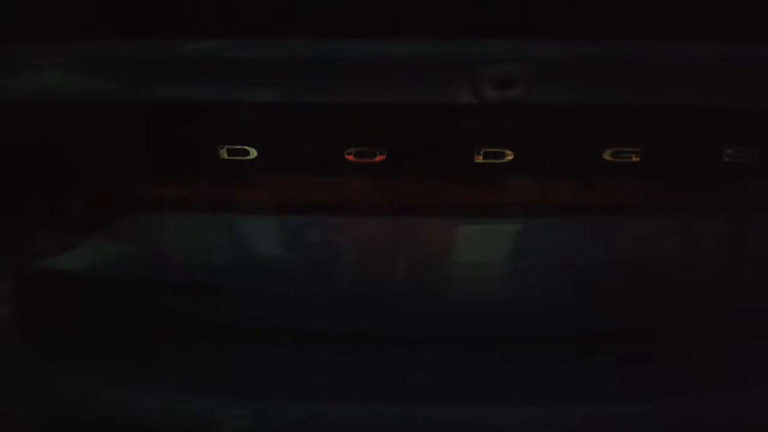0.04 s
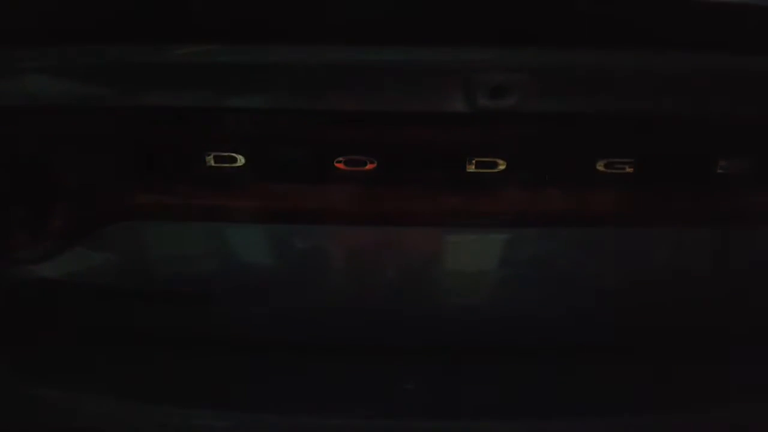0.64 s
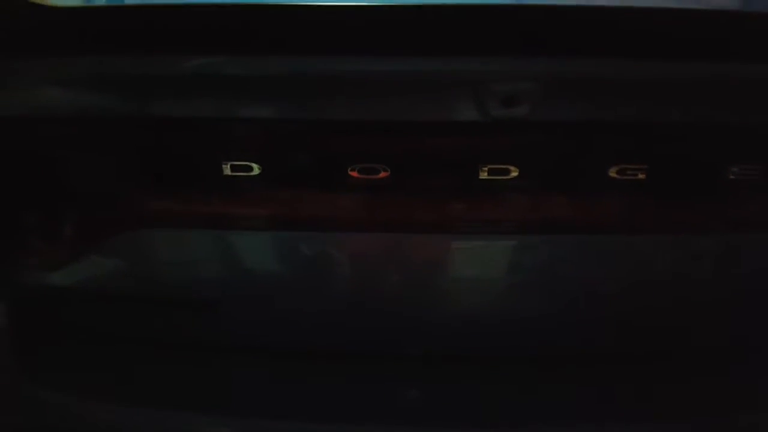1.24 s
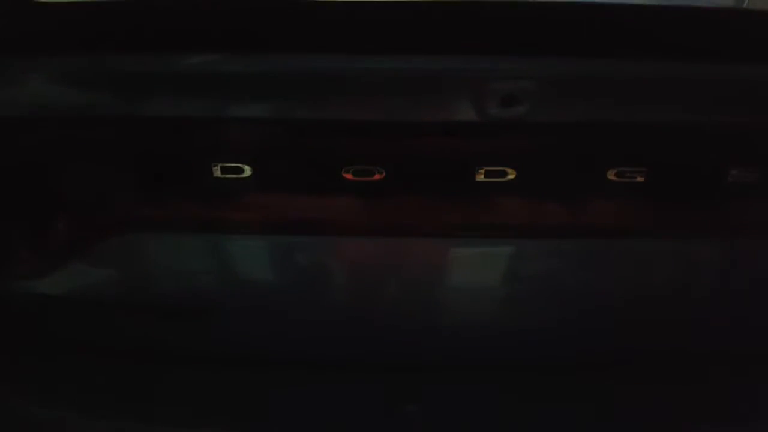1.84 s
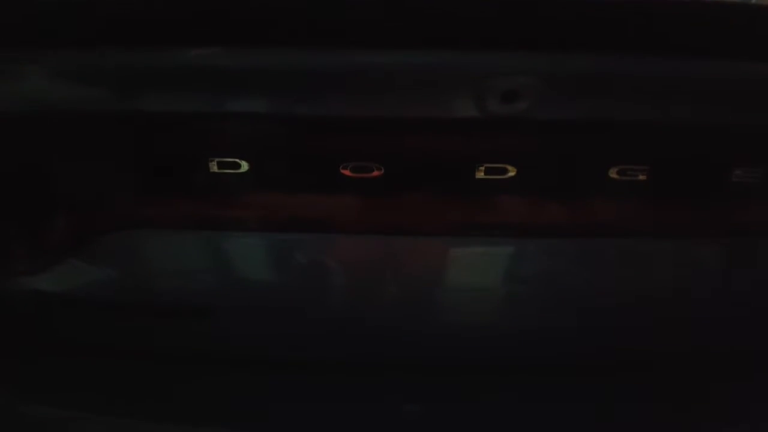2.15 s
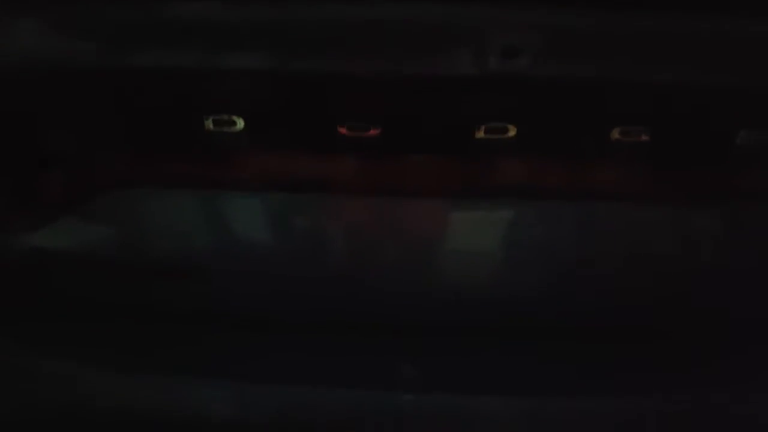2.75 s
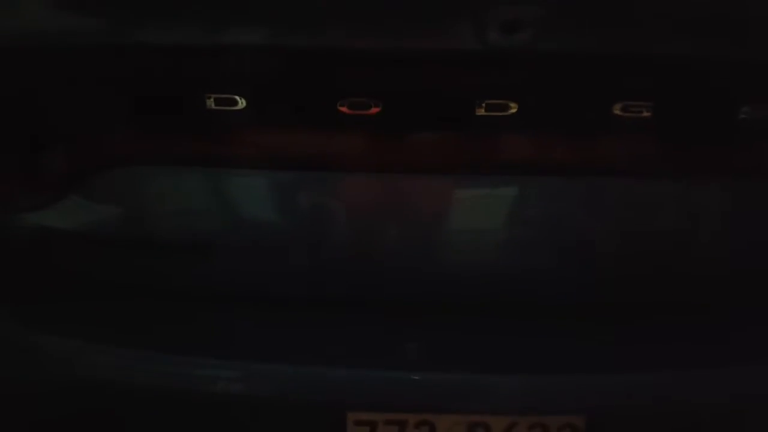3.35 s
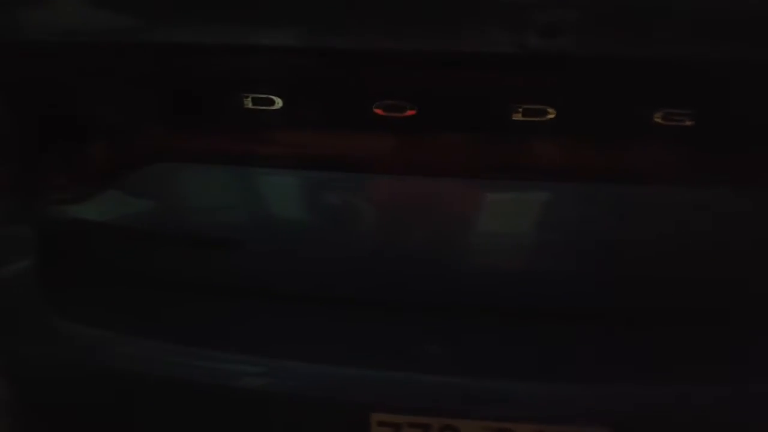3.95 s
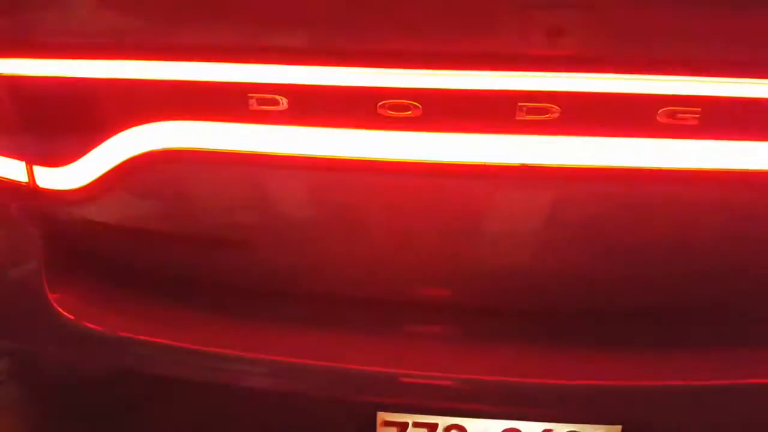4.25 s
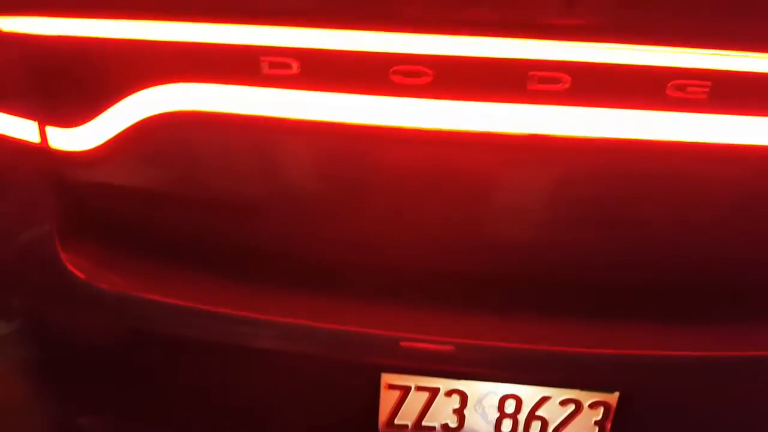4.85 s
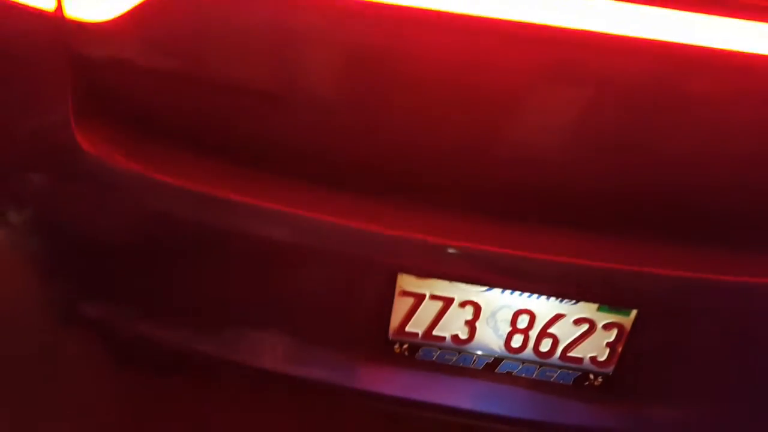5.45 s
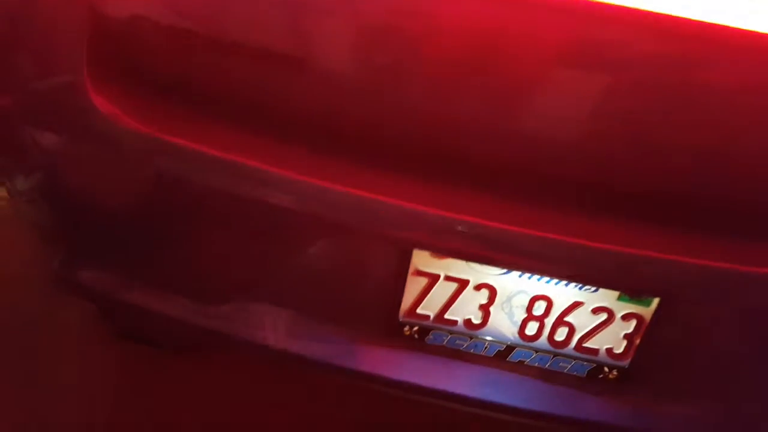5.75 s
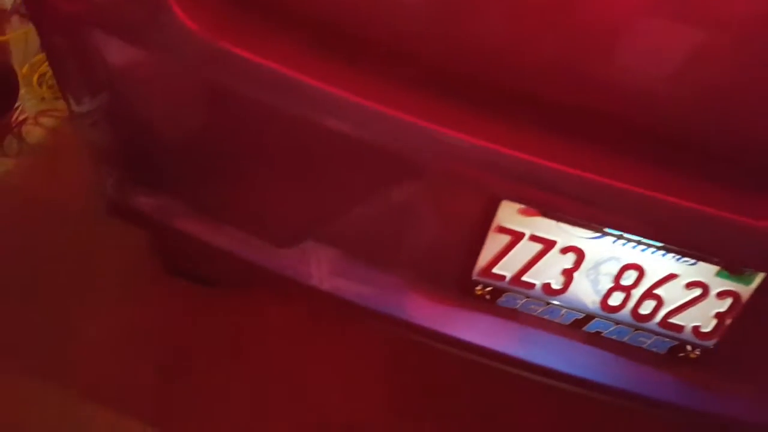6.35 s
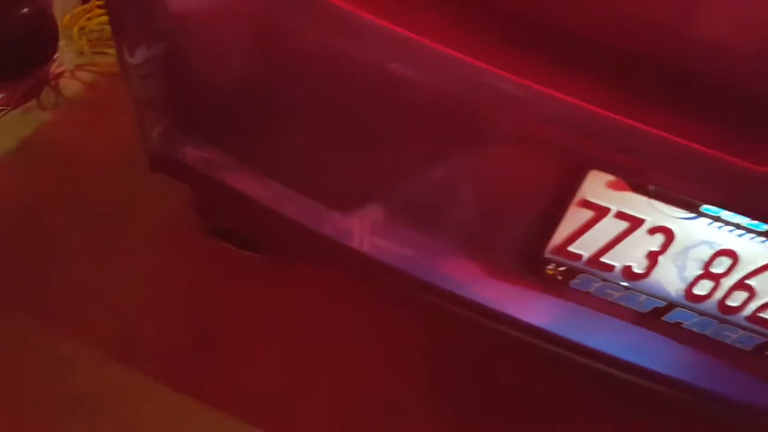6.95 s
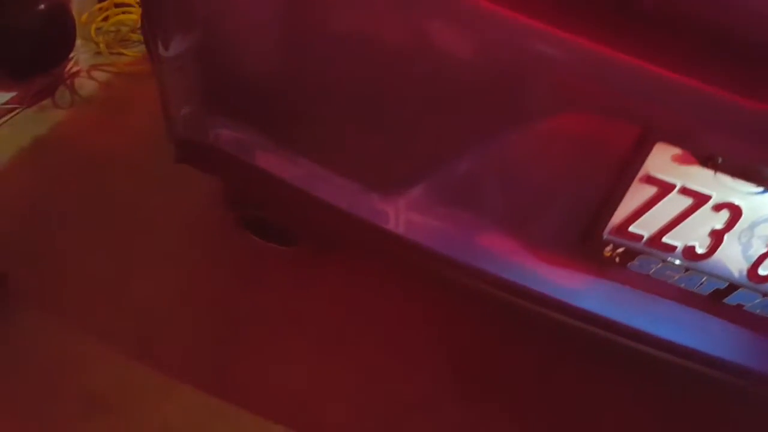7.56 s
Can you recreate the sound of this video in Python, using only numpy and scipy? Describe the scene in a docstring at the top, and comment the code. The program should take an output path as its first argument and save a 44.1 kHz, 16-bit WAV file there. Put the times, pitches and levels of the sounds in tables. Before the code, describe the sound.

Car door locks clunk, a fuel pump whirs, then the starter grinds and the engine barks into a loud, deep idle.

```python
"""A driveway at night, heard by a phone just behind the tailpipes of a cold V8.
The door locks clunk and the fuel pump whirs. The starter grinds for 0.7 s, then the engine
catches with a bark and sinks to a fast idle. Its uneven firings make the exhaust pipes ring,
gas rasps out with each one, and nearby walls scatter the sound."""
import sys
import numpy as np
from scipy import signal
from scipy.fft import rfft, irfft
from scipy.io import wavfile
from scipy.ndimage import uniform_filter1d

SR = 44100
rng = np.random.default_rng(int(sys.argv[2]) if len(sys.argv) > 2 else 0)


def pcm_store(signal):
    """Save signal as 16-bit PCM."""
    levels = np.round(np.clip(np.atleast_2d(signal), -1, 1) * 32767)
    wavfile.write(sys.argv[1], SR, levels.astype(np.int16).T)


N = 336042
T = np.arange(N) / SR
CRANK_S, CATCH_S = 3.453, 4.153  # the starter engages, the engine first fires


def gain(db):
    """Turn decibels into a multiplier."""
    return 10 ** (np.asarray(db) / 20)

def sides(left_db, right_db):
    """One multiplier for each ear."""
    return gain([[left_db], [right_db]])

def curve(points):
    """Join (seconds, value) points with straight lines."""
    return np.interp(T, *np.transpose(points))

def ramp(start, length):
    """Climb from 0 to 1 over the given seconds."""
    return np.clip((T - start) / length, 0, 1)

def fading(start, fade):
    """Stay at 1 until the start, then die away."""
    return np.exp(-np.maximum(T - start, 0) / fade)

def blows(events):
    """The loudness outline of hits that each rise and fade."""
    return np.sqrt(sum((gain(db) * ramp(s, rise) * fading(s + rise, fade)) ** 2
                       for s, db, rise, fade in events))

def unit(x):
    """Scale to an average (rms) level of 1."""
    return x / np.sqrt(np.mean(x ** 2))

def steady(x, samples=6000):
    """Hold the level near 1, by default over about one and a half engine cycles."""
    power = np.mean(np.atleast_2d(x) ** 2, axis=0)
    return x / np.sqrt(uniform_filter1d(power, samples) + 1e-4 * power.mean())

def wander(per_second):
    """A smooth random wobble, about 1 in size."""
    hold = int(SR / per_second)
    steps = np.repeat(rng.standard_normal(N // hold + 1), hold)
    return 1.326 * uniform_filter1d(uniform_filter1d(steps, hold), hold)[:N]

def keep(x, hz, kind, order=4):
    """Keep the "low" or the "high" side of a frequency."""
    return signal.sosfilt(signal.butter(order, hz, kind, fs=SR, output="sos"), x)

def colour(x, points):
    """Shape the tone through (Hz, dB) points, falling steeply beyond both ends."""
    hz, db = np.transpose(points)
    octave = np.log2(np.maximum(np.fft.rfftfreq(8192, 1 / SR), 1))
    beyond = np.abs(octave - np.clip(octave, np.log2(hz[0]), np.log2(hz[-1])))
    shape_db = np.interp(octave, np.log2(hz), db) - np.minimum(24 * beyond, 60)
    cepstrum = irfft(np.log(gain(shape_db)))  # builds a filter that never rings ahead of a hit
    response = irfft(np.exp(rfft(2 * cepstrum[:4096], 8192) - cepstrum[0]))
    return signal.fftconvolve(x, response[None])[:, :N]

def ring(x, notes):
    """Ring a set of notes (Hz, width in Hz, dB); narrow ones ring longer."""
    return sum(gain(db) * signal.lfilter(*signal.iirpeak(hz, hz / width, SR), x)
               for hz, width, db in notes)

def noise(apart_hz=650):
    """Hiss that is alike in both ears in the bass and unrelated in the treble."""
    middle, side = rng.standard_normal((2, N))
    return middle + np.array([[1], [-1]]) * keep(side, apart_hz, "high", order=1)

def scatter(x, echo_s):
    """Dense reflections, different in each ear, that fall 60 dB in echo_s."""
    t = T[:SR // 2]
    echoes = rng.standard_normal((2, len(t))) * gain(-60 * t / echo_s) * (t > .002)
    echoes /= np.sqrt(np.sum(echoes ** 2) / 2)
    return signal.fftconvolve(np.atleast_2d(x), echoes, axes=1)[:, :N]

def clicks(times, sizes):
    """Sharp clicks, each shared between two neighbouring samples."""
    at = np.clip(times * SR, 0, N - 2)
    whole = at.astype(int)
    part = at - whole
    return np.bincount(whole, sizes * (1 - part), N) + np.bincount(whole + 1, sizes * part, N)

def trail(x, fade_s):
    """Give every click a fading tail."""
    return signal.lfilter([1], [1, -np.exp(-1 / (fade_s * SR))], x)

def bursts(events, tone, grain_db):
    """Rattling hits made of grainy noise with the given tone."""
    return blows(events) * unit(colour(noise() * gain(grain_db * wander(400)), tone))


# The night's hush. Each row: frequency in Hz, relative level in dB.
NIGHT_TONE = [(15, -44.5), (25, -19.5), (113, -6.5), (152, -1), (183, -7.5), (281, -19.5), (378, -13),
              (469, -21.5), (2000, -29), (8350, -40.5), (15500, -42)]

def night(level_db=-62.5):
    """A faint, even rumble and hiss."""
    return gain(level_db) * unit(colour(noise(), NIGHT_TONE))

# The phone is lowered to the tailpipe. Each row: time in seconds, closeness from 0 to 1.
CLOSENESS = [(5.2, 0.03), (5.85, 0.17), (6.25, 0.36), (7.3, 0.92)]

def house_echo(car):
    """Houses send back a faint echo, which counts for less near the tailpipe."""
    outgoing = keep(car * gain(-6 * curve(CLOSENESS)), 476, "high")
    return gain(-5) * scatter(keep(outgoing, 3000, "low", order=1), echo_s=.57)

# The pump's whir. Each row: frequency in Hz, relative level in dB.
PUMP_WHIR = [(29, -44.5), (50, -19), (140, -2.5), (211, -7), (250, -9.5), (268, -8), (358, -8), (455, -6),
             (607, -13.5), (652, -13.5), (771, -14), (1340, -17), (1830, -14.5), (3340, -27.5),
             (15500, -43)]
# The pump's hum. Each row: pitch in Hz, level in dB.
PUMP_TONES = [(150.7, -77), (242.2, -63), (355.3, -64), (608.3, -61.5), (780.6, -73), (1825, -69.5),
              (2433, -82), (2799, -73.5), (2998, -78)]

def fuel_pump(start_s=.21, running_db=-53, priming_db=16, whine_hz=4550):
    """A small motor whirs under the car, louder until the fuel pressure is up."""
    level = gain(running_db + priming_db * fading(start_s, .23)) * ramp(start_s, .27)
    phase = 2 * np.pi * np.cumsum(1 + .0015 * wander(4)) / SR
    tones = 0
    for hz, db in PUMP_TONES:
        size = gain(db + 2 * wander(7.16))
        offset = rng.normal(size=(2, 1)) * min(hz / 900, 2)  # high tones reach the ears out of step
        tones += size * np.sin(hz * phase + offset)
    tones += gain(-84 + 2 * wander(3.8)) * (1 - ramp(2.35, .3)) * np.sin(whine_hz * phase)
    whir = unit(colour(noise() * gain(.98 * wander(130)), PUMP_WHIR))
    return level * whir + np.sqrt(2) * tones * ramp(.32, .26)

# Small ticks. Each row: start in seconds, level in dB, rise and fade in seconds.
TICKS = [(.28, -53, .002, .04), (.515, -57, .003, .02), (1.128, -56, 0.0013, .004),
         (1.243, -54, 0.0009, .003), (1.42, -50, 0.0016, .009)]
# Their thin tone. Each row: frequency in Hz, relative level in dB.
TICK_TONE = [(4000, -22), (7000, -4), (12000, -16), (14000, 4), (15500, -11)]

def ticks():
    """Faint, bright ticks close by."""
    return bursts(TICKS, TICK_TONE, grain_db=1)

# Snaps and one ping. Each row: start in seconds, level in dB, rise and fade in seconds.
SNAPS = [(.283, -45, 0.0071, 0.12), (.495, -53, 0.016, 0.026), (1.466, -48, .008, 0.071),
         (1.582, -48, 0.008, 0.085)]
PING = [(1.47, -59, .005, .009)]
# The tone of a snap. Each row: frequency in Hz, relative level in dB.
SNAP_TONE = [(300, -11), (700, 7.5), (1300, -1.5), (2200, 0.5), (3200, -5), (5000, -19), (8000, -16),
             (13000, -35)]
# The brackets' notes. Each row: pitch in Hz, width in Hz, relative level in dB.
BRACKET_NOTES = [(1180, 45, 11), (1570, 35, 9), (2000, 38, 9), (2400, 30, 2), (3100, 35, 2), (4200, 30, 3)]

def actuators(ping_hz=4200):
    """Small electric movers under the bonnet snap and ring their metal brackets; one pings."""
    snaps = bursts(SNAPS, SNAP_TONE, grain_db=2)
    brackets = gain(-4) * np.std(snaps) * unit(ring(snaps, BRACKET_NOTES))
    ping = blows(PING) * np.sqrt(2) * np.sin(2 * np.pi * ping_hz * T)
    return snaps + brackets + ping

# The locks move. Each row: start in seconds, level in dB, rise and fade in seconds.
LOCK_CLUNKS = [(.235, -42.5, 0.014, 0.13), (.278, -27.5, .004, 0.098), (.321, -26, 0.0041, 0.045),
               (.346, -26.5, 0.0032, 0.037), (.4, -57, .01, 1), (.5, -40.5, 0.0061, 0.079)]
# The door's dull tone. Each row: frequency in Hz, relative level in dB.
DOOR_TONE = [(24, -50), (40, -56.5), (78, -4.5), (140, -14.5), (202, -1.5), (251, -9.5), (291, -3),
             (476, -10), (687, -13), (856, -19), (992, -20.5), (2070, -30.5), (14000, -74)]

def door_locks():
    """Lock motors and latches clunk inside the doors."""
    return bursts(LOCK_CLUNKS, DOOR_TONE, grain_db=-.5)

# Chuffs of air. Each row: start in seconds, level in dB, rise and fade in seconds.
CHUFFS = [(3.765, -26, 0.025, 0.028), (4.03, -34, 0.015, .04)]
# Their low tone. Each row: frequency in Hz, relative level in dB.
AIR_TONE = [(25, -10), (45, -2.5), (85, -3.5), (157, 1), (240, -10), (330, -12)]

def pumped_air(flow_db=-40):
    """Before the engine fires, its pistons push air down the pipe."""
    level = np.hypot(gain(flow_db) * ramp(3.52, .06), blows(CHUFFS))
    return level * unit(colour(noise(), AIR_TONE))

# The starter's gear hits its stop. Each row: start in seconds, level in dB, rise and fade in seconds.
GEAR_KNOCK = [(3.47, -17, .015, .025)]
# Grinding gears, scraping teeth, shaken engine block. Each row: frequency in Hz, relative level in dB.
GEAR_TONE = [(250, -10.5), (320, -1), (385, -25), (460, -2), (700, -2.5), (1050, -1.5), (1410, -10.5),
             (2100, -7), (2490, -10), (2950, -7.5), (3400, -13.5), (4500, -13)]
SCRAPE_TONE = [(2240, -9), (3800, -9), (5540, -3.5), (6340, -1), (8560, -7.5), (9350, -14), (10100, -10.5),
               (12900, -20), (15500, -43)]
BLOCK_TONE = [(60, -21), (200, -16), (330, -11), (450, -8.5)]
# The starter's case and the flywheel. Each row: pitch in Hz, width in Hz, relative level in dB.
CASE_NOTES = [(443.7, 10, 11.5), (573, 15, 5.5), (809, 16, 7.5), (880, 20, -9), (1065, 25, -6),
              (1102, 15, -4), (2123, 30, 2.5), (2930, 37, -4.5), (3590, 56, -2.5), (4530, 46, -17)]
# The starter's whine. Each row: multiple of the lowest pitch, relative level in dB.
WHINE_OVERTONES = [(1, 0), (2, -1), (3, -9)]

def starter(teeth_hz=155, whine_hz=1050, squeeze_hz=7.0, speedup_hz_per_s=8.32, surge_db=3):
    """A small gear slams in and clatters on the flywheel, speeding up and swelling each time a piston squeezes
    air."""
    since = T - 3.675  # counted from the first squeeze
    squeezes = squeeze_hz * since + speedup_hz_per_s * since ** 2 / 2
    surge = ramp(3.55, .194) * np.cos(2 * np.pi * squeezes)  # fastest and loudest at each squeeze
    motor_time = np.cumsum(1 + .055 * surge + .014 * wander(90)) / SR
    teeth = teeth_hz * motor_time
    times = np.interp(np.arange(1, int(teeth[-1])), teeth, T)
    hits = clicks(times, gain(3.5 * rng.standard_normal(len(times))))
    contact = 1 + trail(hits, fade_s=.0097)
    whine = sum(np.sin(2 * np.pi * k * whine_hz * motor_time) * gain(db + 2 * wander(35))
                for k, db in WHINE_OVERTONES)
    grind = unit(colour(noise() * contact, GEAR_TONE))
    grind += gain(-5.5) * unit(ring(noise() * contact, CASE_NOTES))
    grind += gain(-7) * unit(scatter(whine, echo_s=.024))
    scrape = unit(colour(noise() * contact, SCRAPE_TONE))
    knock = unit(ring(noise(), CASE_NOTES)) + gain(-10) * unit(colour(noise(), BLOCK_TONE))
    grind_db = -22.5 + surge_db * surge + 7.5 * fading(CRANK_S, .061)
    scrape_db = -38 + surge_db * surge + 17.5 * fading(CRANK_S, .078)
    metal = gain(grind_db) * unit(grind) + gain(scrape_db) * scrape + blows(GEAR_KNOCK) * knock
    engaged = ramp(CRANK_S, .02) * (1 - ramp(4.19, .039))
    return (metal * sides(-.6, .6) + pumped_air()) * engaged

# The exhaust tips' thin steel. Each row: pitch in Hz, width in Hz, relative level in dB.
TIP_NOTES = [(1440, 110, 6), (1654, 50, 3), (2140, 30, 1), (2385, 30, 1), (2795, 42, -4), (3060, 48, -3.5),
             (3560, 27, -15)]

def tip_rattle(times, sizes, spread_db=4):
    """Every puff rattles the steel tips, each time favouring other notes."""
    strengths = sizes * gain(spread_db * rng.standard_normal((len(times), len(TIP_NOTES), 2)).T)
    rattle = [sum(ring(clicks(times, hits), [note]) for note, hits in zip(TIP_NOTES, ear))
              for ear in strengths]
    return keep(keep(np.array(rattle), 3700, "low", order=8), 1230, "high")

# The engine coughs as it catches. Each row: start in seconds, levels of boom, bark, thud and crack
# in dB, rise and fade in seconds.
COUGHS = [(4.151, -4.5, -28, -12, -39, 0.0041, 0.029), (4.178, -9, -17, -4.5, -43, 0.0025, 0.036),
          (4.232, -19.5, -9, -24, -21.5, 0.0096, 0.064), (4.254, -25, -19, -25, -12, 0.0059, 0.023),
          (4.368, -27, -10, -35, -36, 0.011, 0.017), (4.485, -13.5, -41, -27, -48, 0.005, 0.015)]
# The very first pulse. Each row: start in seconds, level in dB, rise and fade in seconds.
FIRST_YELP = [(4.155, -19, .006, .009)]
# The tones of thud, crack and yelp. Each row: frequency in Hz, relative level in dB.
THUD_TONE = [(28, -15), (56, 8.5), (85, 0.5), (150, -3.5), (240, 2), (340, 4), (450, -19.5), (760, 2.5),
             (1000, -11), (1600, -17.5)]
CRACK_TONE = [(900, -17), (1500, -13), (2500, -1.5), (3600, -6), (6000, -14), (9000, -20), (15500, -31)]
YELP_TONE = [(1900, -17), (2400, 3), (2750, -2), (3200, -28)]

def coughs():
    """The first fuel burns hard: a yelp from the tips, thuds in the pipe, cracks that ring the steel."""
    start, _, _, thud_db, crack_db, rise, fade = np.transpose(COUGHS)
    crack = bursts(zip(start, crack_db, rise, fade), CRACK_TONE, grain_db=2.5)
    crack += gain(-15) * np.std(crack) * unit(ring(crack, TIP_NOTES))
    thud = bursts(zip(start, thud_db, rise, fade), THUD_TONE, grain_db=3.5)
    return thud + crack + bursts(FIRST_YELP, YELP_TONE, grain_db=1.5)

# The pipe honks. Each row: start in seconds, pitch in Hz, level in dB, rise and fade in seconds.
HONKS = [(4.195, 790, -19, .02, .03), (4.234, 535, -15, .012, .02), (4.255, 725, -13, .03, .05),
         (4.25, 1120, -21, .02, .09), (4.328, 335, -12, .02, .06), (4.362, 745, -14, .022, .018),
         (4.345, 860, -19, .025, .04), (4.435, 335, -16, .025, .04), (4.64, 338, -15, .05, .06)]

def honks(drive, sharp_share=.08, sag_s=.04, width_hz=14):
    """Surges of gas make the pipe roar on one note at a time; each starts high and sags."""
    gas = keep(keep(drive[None], 278, "high"), 1220, "low")
    notes = 0
    for start, hz, db, rise, fade in HONKS:
        pitch = hz * (1 + sharp_share * fading(start, sag_s))
        spin = np.exp(2j * np.pi * np.cumsum(pitch) / SR)
        note = np.real(spin * trail(gas / spin, 1 / (np.pi * width_hz)))  # rings at the sliding pitch
        notes += blows([(start, db, rise, fade)]) * steady(note, samples=1200)
    return sides(-1, 1) * notes

def throttle(rise_s=.064, hold_s=.042, fall_s=.11):
    """The throttle opens (0 to 1) as the engine catches, holds, then falls shut."""
    return ramp(CATCH_S, rise_s) * fading(CATCH_S + rise_s + hold_s, fall_s)

# The open throttle's roar. Each row: frequency in Hz, relative level in dB.
ROAR_TONE = [(230, 0.5), (380, -1.5), (520, -3.5), (900, -0.5), (1150, -1), (1300, -16.5)]

def roar(drive, level_db=-15.5):
    """The open throttle lets the pulses through almost bare."""
    return gain(level_db) * throttle() * steady(colour(scatter(drive, echo_s=.025), ROAR_TONE))

# Rushing gas. Each row: frequency in Hz, relative level in dB above the bumper, then at the tailpipe.
RASP_TONE = [(768, 1, 3.5), (1203, -13.5, 3.5), (1220, -8.5, -2), (1424, 0, 0.5), (1680, -6.5, -3.5),
             (2280, -5, -5.5), (3060, -19.5, -12.5), (3650, -25, -18.5), (5000, -31, -34),
             (7900, -33.5, -39.5), (11800, -44.5, -45), (15400, -52, -49.5)]

def rasp(puffs, times, sizes, close, hiss_hz=4500):
    """Gas chuffs out with each firing under a smooth hiss; the steel tips rattle along."""
    hz, above_db, close_db = np.transpose(RASP_TONE)
    far = 1 - close
    gas = keep(steady(noise(apart_hz=400) * puffs), hiss_hz, "low") + keep(noise(), hiss_hz, "high")
    gas += gain(-6.5) * far * steady(scatter(clicks(times, sizes), echo_s=.055))
    gas = steady(colour(gas * far, np.c_[hz, above_db]) + colour(gas * close, np.c_[hz, close_db]))
    rattle = gain(-8 - 2 * close) * steady(tip_rattle(times, sizes))
    level = gain(-35 + 17.5 * throttle() + 9.5 * close)
    return level * sides(.1, 3.4) * steady(gas + rattle)

def muffler_smear(x, hz, width_hz):
    """Echoes in the muffler hold back part of each pulse without changing its tone."""
    return x - 2 * ring(x, [(hz, width_hz, 0)])

def waver(x, drift_s=.00011):
    """The travel time through hot gas drifts, so the overtones never stand still."""
    return np.interp(T - drift_s * wander(16), T, x)

# The exhaust's throaty upper notes. Each row: pitch in Hz, width in Hz, relative level in dB.
THROAT_NOTES = [(465, 18, -6), (530, 20, -5), (560, 20, 1), (635, 25, -8), (677, 35, -1), (700, 500, -17),
                (760, 45, -1), (860, 50, -3), (975, 25, -3), (1130, 60, -12)]

def bark(drive, close):
    """Pulses and swirling gas ring the upper notes; ground, car and walls scatter them."""
    smeared = muffler_smear(muffler_smear(drive, 800, 120), 620, 120)
    tone = keep(keep(ring(smeared, THROAT_NOTES), 450, "high"), 1050, "low", order=8)
    shaded = .45 * close * ring(tone, [(850, 300, 0)])  # the growl recedes low behind the pipe
    tone += ring(tone, [(558, 25, -5.5)]) - shaded
    tone = waver(tone + close * ring(tone, [(452, 25, 7.5), (532, 95, 2.4)]))  # the pipe mouth's notes
    echoes = 2 * gain(-7) * np.std(tone) * unit(scatter(tone, echo_s=.11))
    start, _, cough_db, _, _, rise, fade = np.transpose(COUGHS)
    level = np.hypot(gain(-20 + 6 * throttle() - 6 * close), blows(zip(start, cough_db, rise, fade)))
    return level * sides(-1.1, 1.1) * steady(tone + echoes)

# Low notes of the whole exhaust, and long-ringing notes of the tailpipes.
# Each row: pitch in Hz, width in Hz, relative level in dB.
PIPE_NOTES = [(94.2, 14.5, 3.5), (131.3, 17.7, 1), (163.3, 21.3, -1.5), (181.4, 30, -6.5),
              (259.5, 31, -9.5), (313.5, 40, -15.5), (335.3, 32, -8)]
TAILPIPE_NOTES = [(97, 16, -15), (135.7, 17, -6.5), (271, 12, -8), (343.8, 11, 0)]

def boom(pulses, firing_hz, close, in_tune_hz=92, muffler_hz=430):
    """Pulses ring the long pipes, most strongly when the engine fires near their lowest note."""
    rumble = gain(-36.5 + 6.7 * close) * unit(colour(noise(), [(25, -13.5), (50, -8.5), (90, -7.5)]))
    pipe = keep(muffler_smear(ring(pulses, PIPE_NOTES), 210, 110), 63, "high", order=2)
    tone = keep(keep(pipe + ring(pipe, TAILPIPE_NOTES), muffler_hz, "low"), 382, "low", order=6)
    tone += (1 - ramp(5.3, .72)) * ring(tone, [(168, 65, -1.5), (315, 44, -10.5)])  # throaty early revs
    tone = waver(tone + close * ring(tone, [(256, 21, .69), (345, 16, -3)]))  # the pipe mouth's notes
    echoes = gain(-12.5) * scatter(keep(tone, 260, "high", order=2), echo_s=.054)
    off_tune = 1 - np.exp(-((firing_hz - in_tune_hz) / 11) ** 2)
    flare = 1 - ramp(4.455, .029)  # the boom stays thin until the revs start to sink
    start, cough_db, _, _, _, rise, fade = np.transpose(COUGHS)
    level = np.hypot(gain(-10.5 - 6.5 * flare - 3.5 * off_tune), blows(zip(start, cough_db, rise, fade)))
    return level * sides(-.3, .3) * (steady(tone + echoes) + rumble)

# The eight cylinders in firing order. Each row: pulse strength in dB, lateness as a share of the gap
# between firings, strength of the gas puff in dB.
CYLINDERS = [(-1.2, -.03, -2), (-1.2, .1, 4), (2.4, -.06, -2), (-.7, -.07, 0), (-.3, -.03, 3.5),
             (-.8, .05, 7), (-.9, .06, -3), (1.2, -.03, 5.5)]

def firings(firing_hz, cold=.45, settled=.19, settle_s=2.0):
    """Times, pulse sizes and puff sizes: a lumpy pattern of eight, most ragged while cold."""
    count = np.cumsum(firing_hz * (1 + .002 * wander(9)) * (T > CATCH_S)) / SR
    k = np.arange(int(count[-1]))
    pulse_db, late, puff_db = np.array(CYLINDERS)[k % 8].T
    time_luck, pulse_luck, puff_luck = rng.standard_normal((len(k), 3)).T
    ragged = np.interp(k + .5, count, cold + (settled - cold) * ramp(CATCH_S, settle_s))
    times = np.interp(k + .5 + late + .08 * ragged * time_luck, count, T)
    return times, gain(pulse_db + 4 * ragged * pulse_luck), gain(puff_db + 2.2 * puff_luck)

# The revs flare, then sink to a fast idle. Each row: time in seconds, firings per second.
ENGINE_SPEED = [(4.15, 49), (4.29, 116), (4.4, 124), (4.5, 118.8), (4.6, 117), (4.85, 109.7), (5.25, 105.3),
                (5.55, 99.8), (5.85, 94), (6.35, 91.4), (6.9, 93.4), (7.3, 92)]

def exhaust(puff_lag_s=.0063, puff_rise_s=.0015, flow=.2, swirl_db=-6):
    """Each firing sends a pulse down the pipes; a puff of swirling gas leaves just after it."""
    close, firing_hz = curve(CLOSENESS), curve(ENGINE_SPEED)
    times, sizes, puff_sizes = firings(firing_hz)
    pulses = clicks(times, sizes)
    puff_times = times + puff_lag_s
    puffs = flow + trail(clicks(puff_times, puff_sizes), fade_s=.0055)
    puffs = uniform_filter1d(puffs, int(puff_rise_s * SR)) + flow * (1 - close)  # blurred from afar
    drive = steady(pulses) + gain(swirl_db) * steady(rng.standard_normal(N) * puffs)
    pipes = boom(pulses, firing_hz, close) + roar(drive) + bark(drive, close) + honks(drive)
    return (pipes + rasp(puffs, puff_times, puff_sizes, close)) * ramp(CATCH_S, .008)

def scene():
    """The car, its faint echo from the houses, and the still night."""
    car = door_locks() + actuators() + ticks() + starter() + exhaust() + coughs()
    return car + house_echo(car) + fuel_pump() + night()

def record(dry, top_hz=15700):
    """The phone rounds the loudest peaks, stops softly and cuts the highest treble."""
    rounded = dry / (1 + dry ** 12) ** (1 / 12)
    ending = 1 - ramp(T[-1] - .003, .003)
    return signal.sosfilt(signal.ellip(10, .1, 80, top_hz, fs=SR, output="sos"), rounded * ending)


dry = scene()
out = record(dry)
pcm_store(out)
```